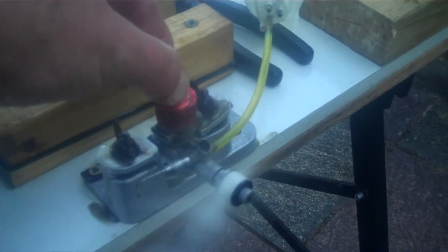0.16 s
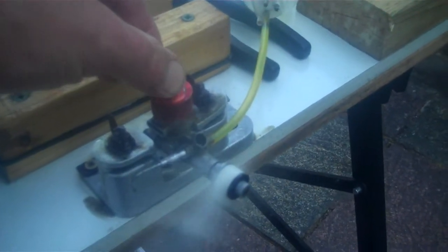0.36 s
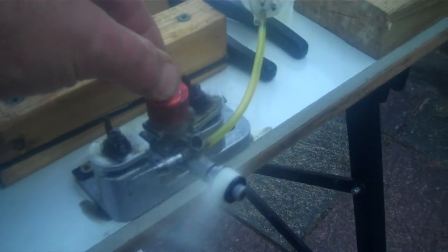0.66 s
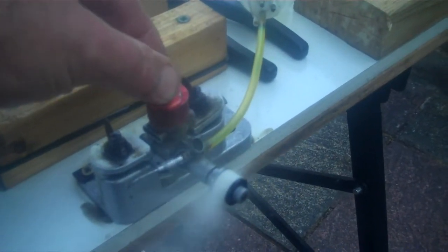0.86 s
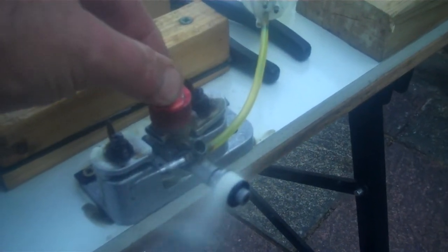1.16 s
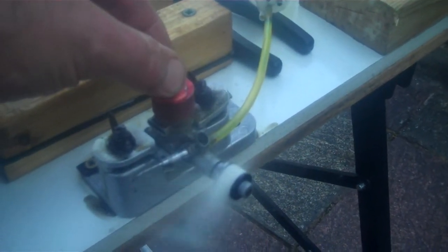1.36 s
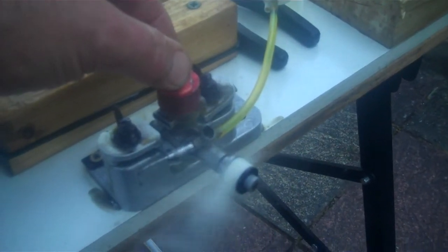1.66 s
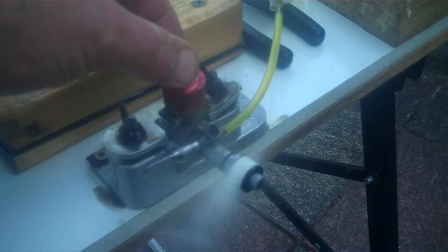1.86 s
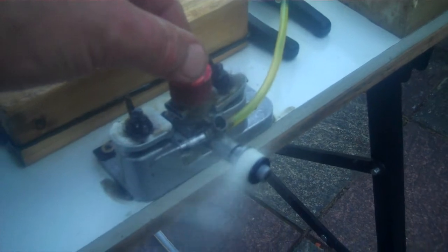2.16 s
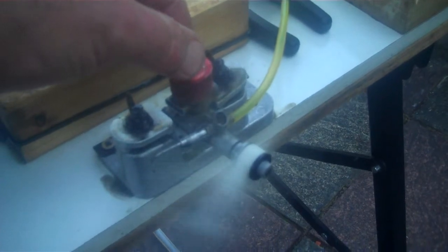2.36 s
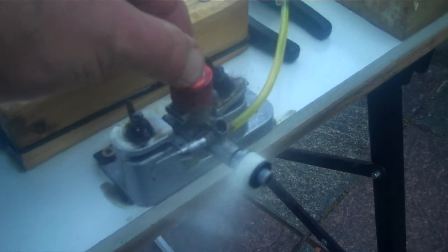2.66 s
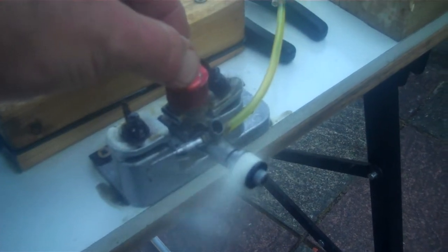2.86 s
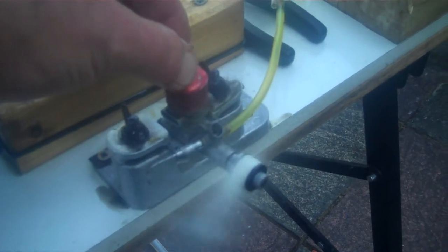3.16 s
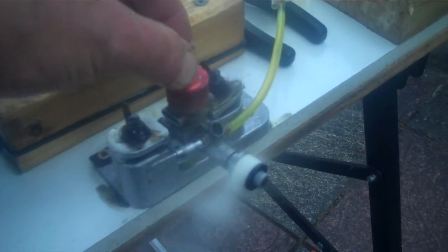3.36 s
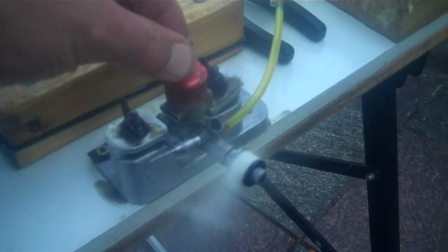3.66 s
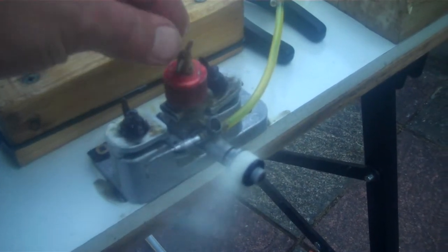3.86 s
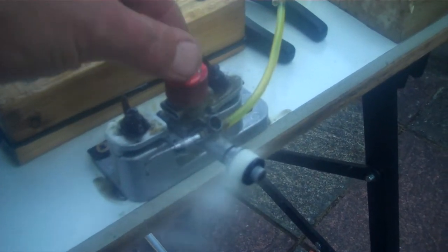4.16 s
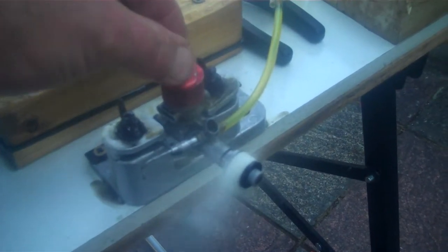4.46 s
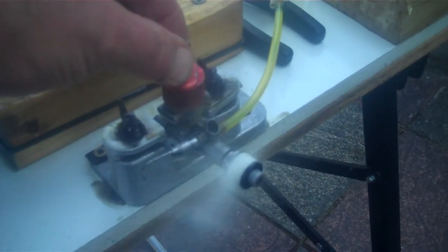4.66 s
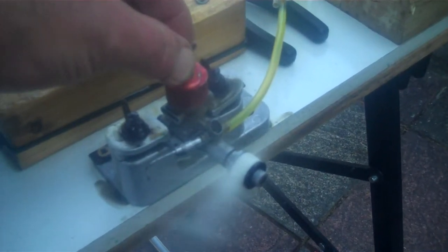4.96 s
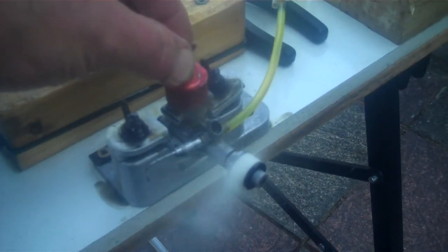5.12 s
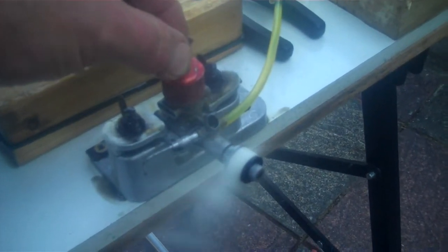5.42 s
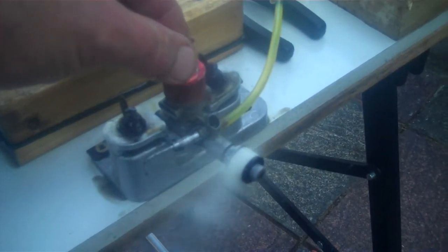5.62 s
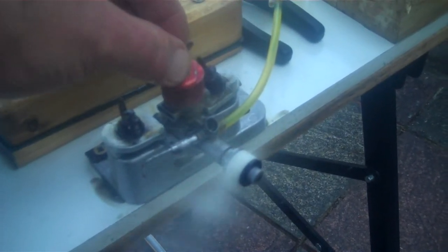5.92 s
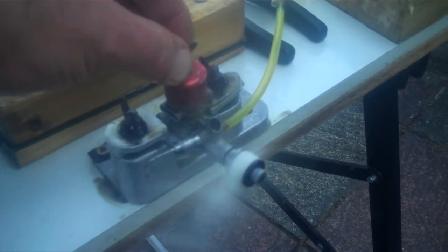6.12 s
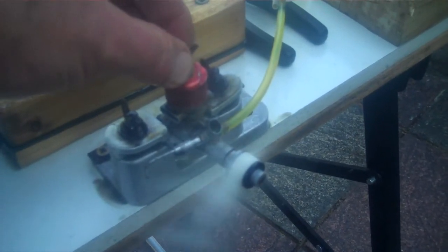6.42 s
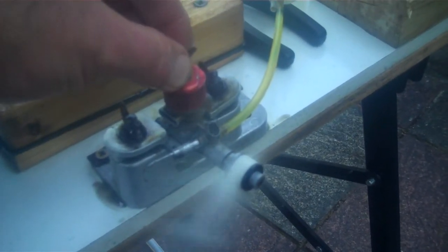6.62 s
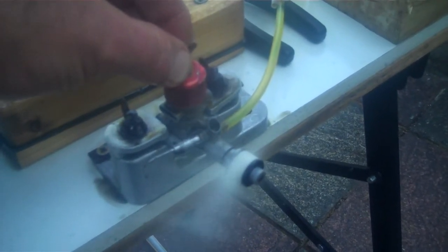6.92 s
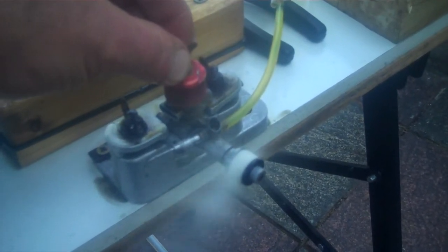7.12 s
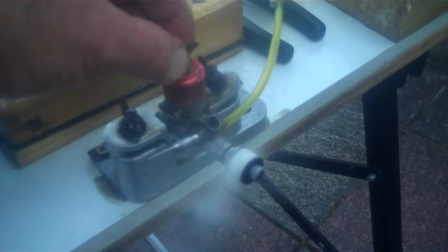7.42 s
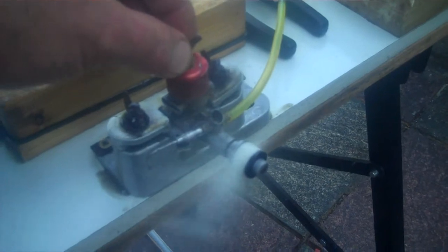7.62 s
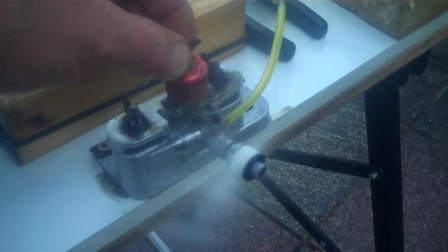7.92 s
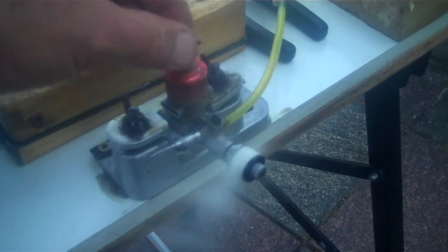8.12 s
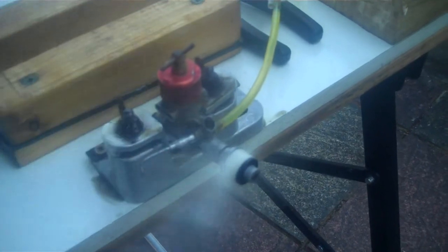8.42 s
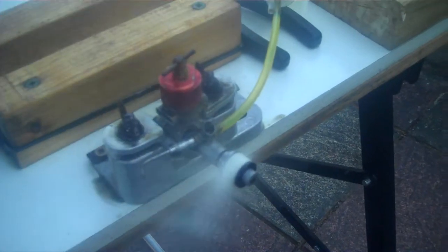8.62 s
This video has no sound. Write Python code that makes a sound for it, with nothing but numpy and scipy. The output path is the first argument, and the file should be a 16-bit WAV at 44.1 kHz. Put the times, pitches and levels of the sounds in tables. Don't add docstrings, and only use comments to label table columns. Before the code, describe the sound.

A small two-stroke model engine buzzes hard and raspy up close, its pitch sagging and recovering repeatedly, over low hum and buffeting propeller wind.

```python
import sys
import numpy as np
from scipy import signal
from scipy.fft import irfft
from scipy.io import wavfile
from scipy.ndimage import uniform_filter1d, map_coordinates

SR = 44100
rng = np.random.default_rng(int(sys.argv[2]) if len(sys.argv) > 2 else 0)


def undo_db(level):
    steps = np.asarray(level, float) / 20
    return 10 ** steps


def int16_out(signal):
    q = np.round(np.clip(np.atleast_2d(signal).T, -1, 1) * 32767)
    wavfile.write(sys.argv[1], SR, q.astype(np.int16))


N = 387198

FREE_HZ, MEAN_HZ = 118.8, 114.5
HUNT_HZ, SAG_SHAPE = 0.1196, 1.86
STRONGER_DB_PER_HZ = 0.15
STREAM_DB, GUST_S = -35.5, 0.044
EDDIES_PER_S, THUMP_DB = 30, 3.5
MS_STEP = 44

# (deepest point [s], speed loss [Hz], fall [s], recovery [s])
SHAFT_SAGS = [(0.014, 3.86, 0.129, 0.101), (0.411, 4.66, 0.241, 0.118), (0.917, 7.35, 0.291, 0.323),
              (1.554, 3.96, 0.295, 0.459), (1.907, 2.39, 0.146, 0.151), (2.05, 8.41, 0.129, 0.222),
              (2.629, 0.97, 0.226, 0.224), (2.925, 6.53, 0.249, 0.341), (3.365, 1.89, 0.096, 0.494),
              (3.813, 5.5, 0.117, 0.123), (4.058, 0.92, 0.106, 0.157), (4.283, 2.38, 0.384, 0.502),
              (4.52, 10.85, 0.099, 0.177), (4.749, 2.52, 0.22, 0.245), (5.267, 8.43, 0.154, 0.275),
              (5.443, 6.55, 0.076, 0.189), (6.334, 5.99, 0.162, 0.349), (6.63, 0.97, 0.147, 0.151),
              (7.016, 5.97, 0.189, 0.333), (7.331, 1.18, 0.174, 0.105), (7.702, 4.37, 0.268, 0.155),
              (8.095, 1.9, 0.4, 0.234), (8.743, 1.66, 0.353, 0.547)]
# (time [s], level [dB])
FIRING_STRENGTH = [
    (0, -21.5),
    (2.5, -21),
    (4.3, -21),
    (4.9, -20.5),
    (6.0, -21),
    (6.7, -20.5),
    (8.2, -20.6),
    (8.78, -22),
]
# (centre [Hz], width [Hz], level [dB])
CRACK_LEFT = [(2350.0, 2500.0, -55.1), (2980.0, 420.0, -3.0), (5380.0, 670.0, -5.4), (5820.0, 2500.0, -5.2),
              (7000.0, 480.0, 4.8), (7720.0, 730.0, -9.9), (8750.0, 390.0, -11.3)]
CRACK_RIGHT = [(1850.0, 840.0, -2.2), (3080.0, 570.0, -15.3), (5060.0, 720.0, 12.6), (4970.0, 250.0, 6.3),
               (6420.0, 1280.0, -0.6), (5550.0, 1340.0, 10.0), (8100.0, 840.0, -21.1)]
# (delay [ms], signed share [1])
BENCH_PATHS_LEFT = [(0.138, 0.09), (0.338, -1.0), (0.624, 0.64), (1.312, -0.24), (1.705, 0.11),
                    (2.044, 0.09)]
BENCH_PATHS_RIGHT = [(-0.161, 0.05), (0.308, 0.94), (0.591, 1.0), (1.281, 0.39), (1.559, 0.23),
                     (2.356, 0.07)]
# (delay [ms], left level [dB], right level [dB])
LATE_ECHOES = [
    (2.75, -13, -17),
    (6.4, -22, -12),
]
# (centre [Hz], width [Hz], level [dB])
BLOCK_LEFT = [(1432, 18.5, 1.5), (1880, 260, -2.5)]
BLOCK_RIGHT = [(1424, 17, -4.5), (1910, 320, -8)]
# (time [s], level [dB])
HAND_GRIP = [
    (0, -34),
    (0.55, -29),
    (1.0, -30),
    (3.0, -32.5),
    (4.2, -30.5),
    (7.7, -30.5),
    (7.95, -30),
    (8.5, -28),
    (8.78, -28.5),
]
# (frequency [Hz], left level [dB/Hz], right level [dB/Hz])
JET_COLOUR = [(500, -16.5, -9), (1480, -26, -24), (3160, -12.5, -5), (4300, 2.5, -3.5), (4850, -23, -6),
              (6000, 2, -5.5), (7140, -7, -13), (7900, -4, -21), (9500, -28, -25), (12000, -29, -30)]
# (frequency [Hz], left level [dB/Hz], right level [dB/Hz])
SPIT_COLOUR = [(6000, -47, -62), (8250, 2, 3), (11000, 7, 0), (11600, 4, 2), (12400, 1, 6.5),
               (13300, -5, -5), (14100, -5, -7), (14300, -20, -18), (15800, -32, -32)]
# (centre [Hz], width [Hz], level [dB])
PING_LEFT = [(6500, 930, -3), (7300, 690, 9.5)]
PING_RIGHT = [(6360, 640, 10), (7230, 200, -11.5)]
# (multiple of shaft speed [1], left level [dB], right level [dB],
# lead of the left [rad], left rise with speed [dB/Hz], right rise with speed [dB/Hz], lead twist [rad/Hz])
SHAFT_ORDERS = [(1, -43.18, -39.13, 3.1, 0.13, 0.97, 0.03), (2, -39.3, -43.37, -2.84, 0.28, 1.06, 0.04),
                (3, -42.88, -40.47, 2.47, 0.52, 0.46, -0.12), (4, -51.91, -40.13, 3.16, 0.73, 0.11, -0.07),
                (5, -46.34, -44.3, -2.22, 0.14, 0.08, 0.05), (6, -44.12, -58.82, -2.25, 0.3, -0.46, 0.15),
                (7, -42.32, -52.29, 0.89, 0.31, 1.24, -0.07), (8, -41.48, -45.49, 0.61, 0.18, 0.99, 0.0),
                (9, -44.83, -45.42, 1.0, 0.23, 0.13, 0.03), (10, -49.63, -46.09, 1.08, -0.26, 0.19, 0.05),
                (11, -48.82, -52.63, 1.29, 0.31, 0.71, -0.01),
                (12, -49.44, -54.72, 0.69, 0.68, 0.72, -0.15), (13, -48.6, -50.19, 0.62, -0.03, 0.44, 0.03),
                (14, -52.11, -50.79, 0.43, 0.46, 0.47, -0.09)]
# (time [s], blade tone level [dB])
HAND_SHADE = [
    (0, -.5),
    (1.8, -.5),
    (2.0, 0),
    (6.1, 0),
    (6.35, -2),
    (8.2, -1.5),
    (8.4, 3),
    (8.78, 2.5),
]
# (time [s], level [dB])
LEFT_DRAUGHT = [(0, -32), (1.0, -58), (1.5, -54), (2.5, -36), (3.6, -46), (5.4, -61), (5.9, -45),
                (6.3, -52), (8.15, -62), (8.5, -46), (8.78, -51)]
# (time [s], level [dB])
GUSTS_LEFT = [(0.28, -41.6), (2.45, -26.5), (2.75, -47), (2.92, -37), (3.15, -42.6), (3.99, -58),
              (5.03, -44.2), (5.69, -43), (5.84, -48), (5.93, -47), (6.09, -43.5), (8.4, -29),
              (8.48, -37.2), (8.6, -40.4)]
GUSTS_RIGHT = [(0.11, -30.0), (0.3, -27.5), (0.52, -30), (1.04, -29), (1.23, -30.5), (1.56, -24),
               (2.27, -33), (2.36, -29.5), (2.65, -25), (2.82, -28), (2.95, -32.8), (3.13, -25),
               (3.23, -30.2), (3.65, -27), (4.3, -32), (4.87, -28), (4.98, -28), (5.09, -32), (5.66, -29.5),
               (5.8, -31), (6.23, -26), (6.33, -34), (6.44, -31.6), (6.69, -29), (6.87, -30), (7.79, -31),
               (7.97, -31), (8.26, -25), (8.37, -41), (8.64, -30)]
# (frequency [Hz], left level [dB/Hz], right level [dB/Hz])
BUFFET_COLOUR = [(15, -8, -10), (40, 2, 1.5), (91, -7, -5.5), (168, -9, -8), (307, -17, -15.5),
                 (600, -32, -32), (1500, -68, -70)]
# (frequency [Hz], left level [dB/Hz], right level [dB/Hz])
RUSH_COLOUR = [(150, -5.5, -14.5), (580, -8.5, -6.5), (1570, -1, -7), (2500, -2, -2.5), (4100, -4.5, -3),
               (6000, 5, -4), (7230, -16, -29), (6960, 8.5, 1), (8330, -2.5, -15), (9400, -9.5, -15.5),
               (11500, -10.5, -19), (13300, -21, -23), (14200, -14, -17), (15800, -28, -28)]


def unit(x):
    return x / np.sqrt(np.mean(x ** 2, axis=-1, keepdims=True) + 1e-20)


def curves(rows):
    s, *columns = np.transpose(rows)
    return [np.interp(np.arange(N) / SR, s, column) for column in columns]


def wobble(rate):
    coarse = np.arange(0, N + 64, 64)
    knots = rng.standard_normal(int(N * rate / SR) + 4)
    smooth = map_coordinates(knots, [coarse * rate / SR])
    return np.interp(np.arange(N), coarse, smooth)


def bump(at, rise, fall, shape):
    t = np.arange(0, N + MS_STEP, MS_STEP) / SR - at
    return np.exp(-np.abs(t / np.where(t < 0, rise, fall)) ** shape)


def fine(coarse):
    return np.interp(np.arange(N), np.arange(len(coarse)) * MS_STEP, coarse)


def filtered(x, response):
    size = 8192
    impulse = irfft(response(np.fft.rfftfreq(size, 1 / SR)), size)
    impulse = np.roll(impulse, size // 2, axis=-1)
    wet = signal.oaconvolve(np.atleast_2d(x), np.atleast_2d(impulse), axes=1)
    return wet[:, size // 2:][:, :N]


def late(f, ms):
    return np.exp(-2j * np.pi * f * ms / 1000)


def colour(points):
    hz, *sides = np.transpose(points)
    return lambda f: undo_db([np.interp(np.log(f + 1), np.log(hz), db) for db in sides])


def resonance(f, centre, width):
    return 1j * f * width / (centre * centre - f * f + 1j * f * width)


def modes(*ports):
    def one_port(f, rows):
        return sum((-1) ** k * undo_db(db) * resonance(f, centre, width)
                   for k, (centre, width, db) in enumerate(rows))
    return lambda f: np.array([one_port(f, rows) for rows in ports])


def pair(alike):
    common, own = rng.standard_normal(N), rng.standard_normal((2, N))
    share = np.clip(alike, 0, 1)
    return np.sqrt(share) * common + np.sqrt(1 - share) * own


def pulses(turns, at, jitter_ms, scatter_db):
    chance = rng.standard_normal((int(turns[-1]), 2))
    where = np.interp(np.arange(len(chance)) + at, turns, np.arange(N))
    where = where + chance[:, 0] * jitter_ms * SR / 1000
    taps = np.floor(where)[:, None] + np.arange(-7, 9)
    offset = taps - where[:, None]
    shape = np.sinc(offset) * np.cos(np.pi * offset / 16) ** 2
    size = undo_db(scatter_db * chance[:, 1:])
    slots = np.clip(taps, 0, N).astype(int)
    return np.bincount(slots.ravel(), (size * shape).ravel(), N + 1)[:N]


def jet(beats, rise_ms, fall_ms, alike):
    ms = np.arange(300) * 1000 / SR
    puff = (1 - np.exp(-ms / rise_ms)) * np.exp(-ms / fall_ms)
    gate = signal.fftconvolve(beats, puff)[:N]
    return unit(gate * pair(alike))


def shaft():
    lost = sum(loss * bump(s, fall, back, SAG_SHAPE) for s, loss, fall, back in SHAFT_SAGS)
    return FREE_HZ - fine(lost) + HUNT_HZ * wobble(12)


def crack(beats, faster):
    port = modes(CRACK_LEFT, CRACK_RIGHT)

    def band(f):
        return np.clip((f - 1350) / 500, 0, 1) * np.clip((10000 - f) / 1000, 0, 1)

    def bench(f, part):
        return np.array([sum(share * late(f, ms) for ms, share in paths[part])
                         for paths in (BENCH_PATHS_LEFT, BENCH_PATHS_RIGHT)])

    def ground_answer(f):
        return sum(undo_db([[left], [right]]) * late(f, ms) for ms, left, right in LATE_ECHOES)

    direct = filtered(beats, lambda f: port(f) * band(f) * bench(f, slice(0, 2)))
    bounced = filtered(beats, lambda f: port(f) * band(f) * bench(f, slice(2, None)))
    sharp = direct + undo_db(0.45 * wobble(3) + 0.3 * wobble(40)) * bounced
    ground = filtered(sharp, ground_answer)
    body = filtered(sharp, lambda f: 1 / (1 + (f / 3700) ** 8))
    bark = undo_db(-0.3 * faster + 0.41 * wobble(2.494)) - 1
    return sharp + bark * body + undo_db(2.5 * wobble(2.47)) * ground


def block_knock(beats):
    block = modes(BLOCK_LEFT, BLOCK_RIGHT)
    grip_db = uniform_filter1d(curves(HAND_GRIP)[0], size=6000)
    freedom = undo_db(2.1 * (grip_db - grip_db.mean()))
    return freedom * filtered(beats, lambda f: block(f) * late(f, 0.38))


def port_tick(beats):
    spit_gain = colour(SPIT_COLOUR)
    return filtered(beats, lambda f: spit_gain(f) * np.array([late(f, 0.211), late(f, 0.241)]))


def oily_spit(turns):
    drops = pulses(turns, at=0.965, jitter_ms=0.05, scatter_db=1.5) * undo_db(1.1 * wobble(9))
    return filtered(jet(drops, rise_ms=0.3, fall_ms=0.9, alike=0.1), colour(SPIT_COLOUR))


def exhaust(turns, faster):
    beats = unit(pulses(turns, at=0.945, jitter_ms=0.006, scatter_db=0.5))
    roar = filtered(jet(beats, rise_ms=0.44, fall_ms=0.99, alike=0.52), colour(JET_COLOUR))
    firing = undo_db(10.5) * crack(beats, faster) + undo_db(0.5) * block_knock(beats) + undo_db(-0.5) * roar
    shaded = filtered(firing, lambda f: 1 - 0.6 * resonance(f, 4080, 550))
    return shaded + undo_db(-15.0) * oily_spit(turns) + undo_db(-18.5) * port_tick(beats)


def sparks(turns):
    beats = pulses(turns, at=0.96, jitter_ms=0.03, scatter_db=6)
    hiss = jet(beats, rise_ms=0.1, fall_ms=0.3, alike=0.5)
    return undo_db(-24.5) * filtered(hiss, lambda f: (f > 14300) * undo_db((14300 - f) / 75))


def ping(turns):
    beats = pulses(turns, at=0.41, jitter_ms=0.012, scatter_db=1.3)
    strike = np.hanning(25) * np.cos(2 * np.pi * 6900 * np.arange(25) / SR)
    soft = signal.fftconvolve(beats, strike)[:N]
    shake = unit(soft) + undo_db(-10) * jet(beats, rise_ms=0.3, fall_ms=0.59, alike=0.22)
    return undo_db([[-7], [-8]]) * unit(filtered(shake, modes(PING_LEFT, PING_RIGHT)))


def hum(turns, faster):
    out = np.zeros((2, N))
    growth = np.maximum(faster, -7)
    for k, left_db, right_db, lead, left_rise, right_rise, twist in SHAFT_ORDERS:
        angle = 2 * np.pi * k * (turns - 0.022) + np.pi
        level_db = np.array([left_db + left_rise * growth, right_db + right_rise * growth])
        if k == 2:
            level_db[0] += curves(HAND_SHADE)[0]
        sway = np.array([wobble(2.71), wobble(4)])
        level = np.sqrt(2) * undo_db(level_db + 6.3 + 0.6 * sway)
        out += level * np.cos([angle, angle - lead - twist * faster])
    return out


def gusts(rows):
    return fine(sum(undo_db(db) * bump(s, GUST_S, GUST_S, shape=1.2) for s, db in rows))


def wash():
    passed = np.arange(N) * EDDIES_PER_S / SR
    strikes = np.array([pulses(passed, at=0.5, jitter_ms=9.18, scatter_db=1.5) * np.sign(wobble(20))
                        for port in range(2)])
    rumble = pair(alike=0) + undo_db(THUMP_DB) * unit(strikes)
    eddies = unit(filtered(rumble, colour(BUFFET_COLOUR)))
    left = np.hypot(undo_db(curves(LEFT_DRAUGHT)[0]), gusts(GUSTS_LEFT))
    right = np.hypot(undo_db(STREAM_DB + 0.7 * wobble(3.5)), gusts(GUSTS_RIGHT))
    return undo_db(0.3) * np.array([left, right]) * eddies


def rush():
    return undo_db(-3.5 + 1.1 * wobble(8)) * filtered(pair(alike=0.57), colour(RUSH_COLOUR))


def thin_patches(x):
    for centre_hz in (11600, 12200, 13200, 13800):
        patch = filtered(x, lambda f: np.exp(-((f - centre_hz) / 330) ** 2))
        thinning_db = -11 * np.clip(wobble(30) - 0.15, 0, 1.2)
        x = x + (undo_db(thinning_db) - 1) * patch
    return x


def scene():
    speed_hz = shaft()
    turns, faster = np.cumsum(speed_hz) / SR, speed_hz - MEAN_HZ
    strength_db = curves(FIRING_STRENGTH)[0] + STRONGER_DB_PER_HZ * faster
    steady = thin_patches(exhaust(turns, faster) + ping(turns) + rush())
    steady = filtered(steady, lambda f: undo_db(-np.clip((f - 14250) / 25, 0, 90)))
    return undo_db(strength_db) * (steady + sparks(turns)) + hum(turns, faster) + wash()


def low_pass(x):
    return signal.sosfilt(signal.butter(12, 15700, fs=SR, output="sos"), x)


def record(dry):
    mix = filtered(dry, lambda f: 1.0 * (f < 15830))
    return low_pass(mix)


dry = scene()
out = record(dry)
int16_out(out)
```